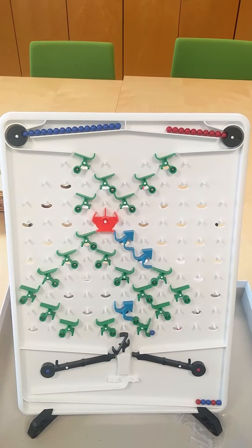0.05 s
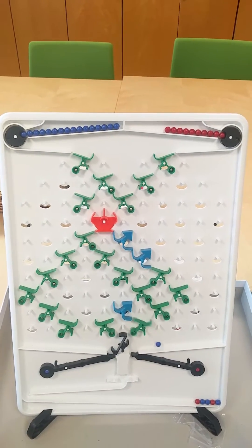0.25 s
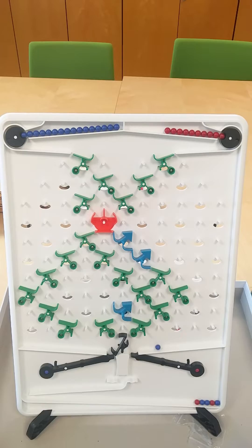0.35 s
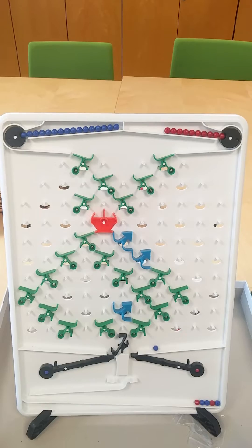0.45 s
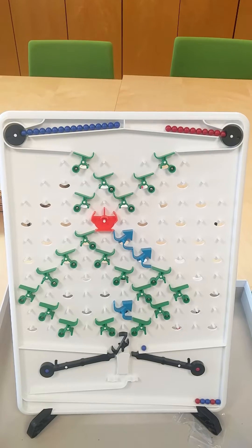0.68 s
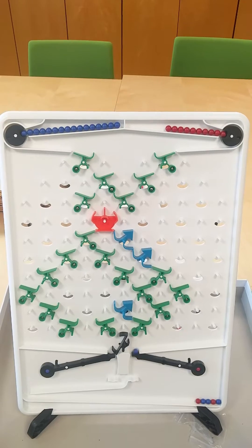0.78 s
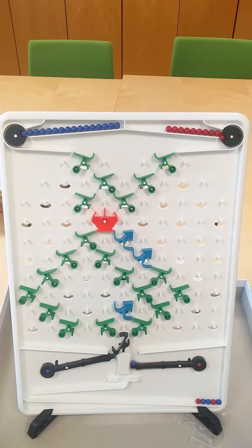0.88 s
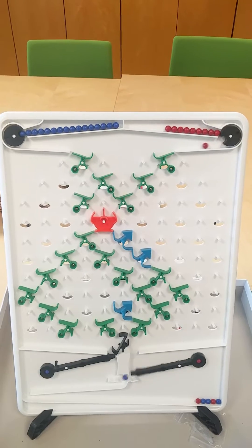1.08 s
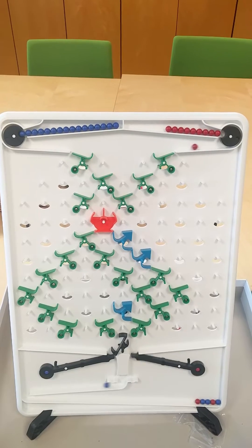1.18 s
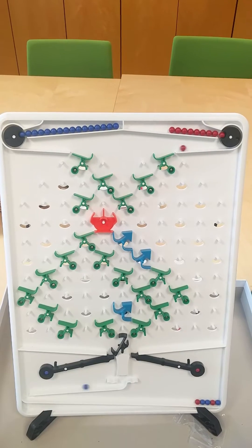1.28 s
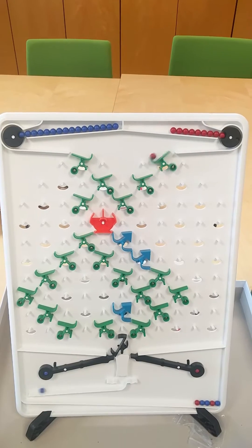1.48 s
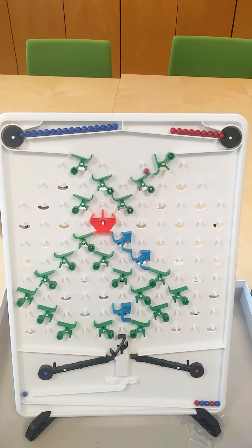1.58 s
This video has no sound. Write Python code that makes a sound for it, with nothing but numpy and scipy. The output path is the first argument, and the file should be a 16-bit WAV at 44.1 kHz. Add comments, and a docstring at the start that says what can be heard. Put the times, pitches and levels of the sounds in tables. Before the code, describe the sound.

Small balls clicking, bouncing and rolling down a plastic marble run over faint ventilation.

```python
"""Small balls run down an upright plastic marble board in a meeting room, over rumbling ventilation.
One drops on to the upper ramp and bounces to rest, each inelastic impact bringing the next sooner.
It rolls on to a lever that trips the ball release, then bounces on the lower ramp. The lever falls
back, the release snaps shut and the next ball rolls in. Impacts excite the damped modes of the
plastic, rolling shakes the board through tiny bumps, and the room reflects both."""
import sys
import numpy as np
from scipy import signal
from scipy.fft import rfft, irfft
from scipy.io import wavfile

SR = 44100
rng = np.random.default_rng(int(sys.argv[2]) if len(sys.argv) > 2 else 0)


def put_to_file(sound):
    """Save the sound as 16-bit audio at rate SR, in the file named by the first command-line argument."""
    columns = np.atleast_2d(sound).T  # one column per channel
    safe = np.clip(columns, -1, 1)
    whole_steps = np.round(safe * 32767)
    wavfile.write(sys.argv[1], SR, whole_steps.astype(np.int16))


N = 72765


def amp(db):
    """Decibel scale: level to amplitude ratio."""
    return 10 ** (np.asarray(db) / 20)


def unit(x):
    """Normalisation to a mean energy of one per channel."""
    return x / np.sqrt(np.mean(np.sum(x ** 2, -1)) + 1e-20)


def read(points, hz):
    """Interpolation of a table on a log-frequency axis."""
    f, value = np.transpose(points)
    return np.interp(np.log(hz + 1), np.log(f + 1), value)


def add(mix, start_s, sound):
    """Superposition: a sound joins the mix at its start time."""
    part = mix[:, max(round(start_s * SR), 0):][:, :sound.shape[1]]
    part += sound[:, :part.shape[1]]


def coloured(x, curve, size=2048):
    """Minimum-phase filtering at unit energy; curve maps frequency to decibels."""
    hz = abs(np.fft.fftfreq(size, 1 / SR))
    log_gain = np.log(amp(np.maximum(curve(hz), -100)))
    taps = np.fft.ifft(np.exp(np.conj(signal.hilbert(log_gain)))).real[:size // 2]
    return signal.fftconvolve(x, unit(taps)[None], axes=1)[:, :x.shape[1]]


# left-right likeness of the direct sound: (frequency [Hz], coherence [0-1])
COHERENCE = [(50, 0.99), (300, 0.83), (800, 0.78), (2000, 0.66), (5000, 0.18), (9000, 0.17)]
def paired(x, lead_ms=None, spacing_m=0.18, sound_m_per_s=343):
    """Spatial coherence at two microphones: direct sound with a left lead, or else a diffuse field."""
    hz = np.fft.rfftfreq(x.shape[1], 1 / SR)
    left, unrelated = rfft(x)
    coherence = read(COHERENCE, hz)
    if lead_ms is None:
        coherence *= np.sinc(2 * hz * spacing_m / sound_m_per_s)
        lead_ms = 0
    right = coherence * left + np.sqrt(1 - coherence ** 2) * unrelated
    delay = np.exp(-2j * np.pi * hz * lead_ms / 1000)
    return irfft(np.array([left, right * delay]), x.shape[1])


# spectrum of the ventilation: (frequency [Hz], relative level [dB])
VENT_SPECTRUM = [(20, -26), (42, -18), (70, -2), (110, -0.5), (150, -7), (220, -13), (270, -17.5),
                 (320, -7.5), (500, -20.5), (620, -17), (700, -8), (800, -33.5), (1100, -23), (2500, -36),
                 (6000, -35), (8000, -40.5), (10000, -61.5), (13000, -56)]
def ventilation(air_db=-69, hum_hz=108, hum_db=-78):
    """Stationary noise in a diffuse field: a low rumble, with a faint pure tone."""
    noise = paired(rng.standard_normal((2, N + 4096)))
    air = coloured(noise, lambda f: read(VENT_SPECTRUM, f), size=8192)[:, -N:]
    hum = np.sin(2 * np.pi * hum_hz * np.arange(N) / SR)
    return amp(air_db) * np.sqrt(N) * unit(air) + amp(hum_db) * hum


# decay of the room: (frequency [Hz], reverberation time [s])
ROOM_T60 = [(150, 0.84), (500, 0.19), (1000, 0.22), (2000, 0.4), (4000, 0.26), (7000, .27), (8500, 0.36),
            (10000, 0.32)]
# strength of the reflections: (frequency [Hz], level [dB])
ROOM_LEVEL = [(150, -16), (500, -4), (1500, -1.5), (4000, -4), (7000, -5), (10000, -5.5)]
def room(x, first_s=0.001, build_s=0.01):
    """Reverberation: diffuse reflections build up and decay exponentially, slowest in the bass."""
    t = np.arange(SR // 2) / SR
    hz, age, bands = signal.stft(paired(rng.standard_normal((2, len(t)))), SR, nperseg=256)
    t60 = read(ROOM_T60, hz)[:, None]
    bands *= amp(read(ROOM_LEVEL, hz)[:, None] - 60 * age / t60)
    bands *= np.sqrt(2 * np.log(1000) / t60 / SR)  # a longer decay adds no energy
    tail = signal.istft(bands, SR, nperseg=256)[1][:, :len(t)]
    onset = np.clip((t - first_s) / build_s, 0, 1)
    return signal.fftconvolve(x, tail * onset, axes=1)[:, :N]


def smooth_reverberation(x, count=4, turn_s=0.07):
    """Room reverberation: four random tails crossfade in turn, every 70 ms, so echoes sound smooth."""
    turn = np.arange(N) / SR / turn_s
    turns_away = [abs((turn - k + count / 2) % count - count / 2) for k in range(count)]
    return sum(room(x * np.cos(np.pi / 2 * np.minimum(away, 1))) for away in turns_away)


# strength of the rolling, before its treble is dulled: (time [s], level [dB])
ROLL_LEVEL = [(0, -55), (0.072, -62.5), (0.091, -57), (.115, -87), (.16, -65.5), (.2, -58.5), (.42, -52.5),
              (.5, -50.5), (.55, -72), (.62, -81), (0.739, -76.5), (.8, -66.5), (0.871, -68), (1.0, -66.5),
              (1.19, -58), (1.33, -54.5), (1.43, -53), (1.65, -51)]
# response of the board to rolling: (frequency [Hz], relative level [dB])
ROLL_SPECTRUM = [(100, -19.5), (220, -20.5), (310, 1), (500, -21.5), (700, 0), (1200, 3.5), (2100, 3),
                 (3400, -2), (5000, -0.5), (6900, -8.5), (8000, -40), (8800, -24.5), (10000, -45.5)]
def rolling(bumps_per_s=3400, treble_hz=2170, fast_db=-57):
    """Roughness excitation: tiny bumps shake the board; a faster, louder ball sounds brighter."""
    bumps = rng.standard_normal((2, N)) * (rng.random(N) < bumps_per_s / SR)
    bumps *= amp(1.5 * np.minimum(rng.exponential(1, N), 2))  # up to 3 dB of extra spread
    shake = coloured(paired(bumps, lead_ms=0.11), lambda f: read(ROLL_SPECTRUM, f))
    shake = np.sqrt(N) * unit(shake)
    level = np.interp(np.arange(N) / SR, *np.transpose(ROLL_LEVEL))
    dull = signal.sosfiltfilt(signal.butter(2, treble_hz, fs=SR, output="sos"), shake)
    treble = (shake - dull) * amp(np.minimum(level - fast_db, 0))
    return amp(level) * (dull + treble)


# loose parts knocking on the board: (time [s], level [dB])
THUD_BLOWS = [(.2545, -18.5), (.339, -26.5), (1.062, -21.5), (1.2719, -17.5), (1.283, -25)]
# spectrum of the flexing board: (frequency [Hz], relative level [dB])
THUD_SPECTRUM = [(100, -31), (200, -13), (300, -5.5), (500, -3), (700, -1.5), (900, -4.5), (1300, -10.5),
                 (3000, -13), (8000, -49.5)]
def thuds(t60=0.045, attack_s=0.00066):
    """Flexural vibration: soft blows bend the whole board, sounding low, hollow and short."""
    t, out = np.arange(SR // 5) / SR, np.zeros((2, N))
    envelope = (1 - np.exp(-t / attack_s)) * amp(-60 * t / t60)
    for start_s, db in THUD_BLOWS:
        flex = paired(rng.choice([-1., 1.], (2, len(t))), lead_ms=0.14) * envelope
        add(out, start_s, amp(db) * unit(coloured(flex, lambda f: read(THUD_SPECTRUM, f))))
    return out


def strikes(blows, spectrum, modes, t60, attack_s, ring_db, body_db, pan_db, lead_ms):
    """Modal superposition: a blow excites a crack of dense modes, a few ringing ones and a board boom."""
    repeat_share = 0.3  # part of the crack's energy that is alike from blow to blow
    bass_hz, pivot_hz, body_t60 = 910, 3500, 0.35
    body_band = signal.butter(3, [250, 756], "band", fs=SR, output="sos")
    t, out = np.arange(SR // 3) / SR, np.zeros((2, N))
    rise = 1 - np.exp(-t / attack_s)
    common = rng.choice([-1., 1.], (2, len(t)))
    for start_s, db, bass_db, tilt_db in blows:
        def colour(f):
            octaves = np.log2(np.maximum(f, bass_hz) / pivot_hz)
            return read(spectrum, f) + bass_db / (1 + (f / bass_hz) ** 2) + tilt_db * octaves

        fresh = rng.choice([-1., 1.], common.shape)
        dense = paired(np.sqrt(repeat_share) * common + np.sqrt(1 - repeat_share) * fresh, lead_ms)
        crack = coloured(dense * rise * amp(-60 * t / t60), colour)
        ring = sum(amp(level - 60 * t / mode_t60) * np.sin(2 * np.pi * (hz * t + rng.random((2, 1))))
                   for hz, level, mode_t60 in modes)
        body = signal.sosfilt(body_band, dense * amp(-60 * t / body_t60))
        blow = unit(crack) + amp(ring_db) * unit(ring * rise) + amp(body_db + bass_db) * unit(body)
        add(out, start_s, amp(db) * blow)
    return out * amp([[pan_db / 2], [-pan_db / 2]])


# a ball touching small parts: (time [s], level [dB], bass [dB], treble tilt [dB/octave])
TICK_BLOWS = [(.006, -31, -1.5, -1.5), (1.009, -27, -3.5, -2), (1.3935, -11.5, -3, 0.5),
              (1.3962, -18.5, -9, 3), (1.4045, -28.5, 4, -4.5), (1.454, -27.5, 25.5, 15),
              (1.521, -36, 17, -2), (1.536, -24.5, -0.5, 0), (1.644, -20.5, -11, -1)]
# crack of the small parts: (frequency [Hz], relative level [dB])
TICK_SPECTRUM = [(100, -40), (650, -3.5), (1500, -19), (3900, -11), (4550, 4), (5400, 2), (6200, -7),
                 (6900, -1.5), (8000, -34), (9100, -17.5), (10000, -51)]
# their resonances: (frequency [Hz], relative level [dB], T60 [s])
TICK_MODES = [(4800, 0.29, .04), (4800, -1.2, .04), (5100, -1.6, .04)]
def ticks():
    """Damped resonance: small parts touched by a ball ring high and die quickly."""
    return strikes(TICK_BLOWS, TICK_SPECTRUM, TICK_MODES, t60=0.028, attack_s=0.00037,
                   ring_db=-20.5, body_db=-27.5, pan_db=2, lead_ms=0.061)


# the release opening and shutting: (time [s], level [dB], bass [dB], treble tilt [dB/octave])
RELEASE_BLOWS = [(.8755, -12, 8, 2), (.891, -20, -6, -3), (.9058, -14.5, 7, 1), (1.2712, -3, 6.5, 4)]
# crack of the release: (frequency [Hz], relative level [dB])
RELEASE_SPECTRUM = [(100, -30), (300, -29), (700, -10), (1200, -15), (2800, -9.5), (4700, -4.5), (5450, 2),
                    (6200, -6), (7000, -19), (7450, -13), (8000, -29.5), (8700, -24), (10000, -46)]
# its resonances: (frequency [Hz], relative level [dB], T60 [s])
RELEASE_RING = [(5520, 0.5, 0.15), (5350, -27, 0.24)]
def ball_release():
    """Impulsive excitation: the brief contacts of the release give bright snaps."""
    return strikes(RELEASE_BLOWS, RELEASE_SPECTRUM, RELEASE_RING, t60=0.046, attack_s=0.00025,
                   ring_db=-17.5, body_db=-25, pan_db=0.5, lead_ms=0.11)


# the lever hitting its stop: (time [s], level [dB], bass [dB], treble tilt [dB/octave])
LEVER_BLOWS = [(1.212, 3.5, 4, -2.5), (1.231, -10.5, 6.5, -3.5), (1.251, -12, 7, 3.5), (1.329, -19, 18, -1),
               (1.372, -25, 18, -2.5)]
# crack of the lever: (frequency [Hz], relative level [dB])
LEVER_SPECTRUM = [(100, -38), (300, -44), (1000, -16.5), (2000, -8.5), (2500, -7), (3700, -5.5), (4700, 2),
                  (5800, -0.5), (7000, -5), (8000, -32), (9000, -17), (10000, -42)]
# its resonances: (frequency [Hz], relative level [dB], T60 [s])
LEVER_RING = [(1810, -26, .15), (2090, -21, 0.36), (3125, -3.5, 0.5), (4710, 15, 0.14), (4400, -1, 0.19),
              (4780, -4, 0.05)]
def lever():
    """Free vibration: the lever falls back on its stop and rings after each weakening knock."""
    return strikes(LEVER_BLOWS, LEVER_SPECTRUM, LEVER_RING, t60=0.033, attack_s=0.00041,
                   ring_db=-19, body_db=-36.5, pan_db=0.5, lead_ms=0.15)


# bounces on the lower ramp: (time [s], level [dB], bass [dB], treble tilt [dB/octave])
LOWER_BLOWS = [(1.0181, -16, 10, 2), (1.036, 1.5, -1, 3), (1.0905, -3, -5, 1), (1.128, -2, -0.5, 2),
               (1.1548, -9.5, -9, 1), (1.175, -14.5, 14, 0), (1.5693, -16.5, 5.5, -2)]
# crack of the lower ramp: (frequency [Hz], relative level [dB])
LOWER_SPECTRUM = [(100, -28), (300, -20), (650, -9.5), (1000, -6.5), (1800, -2.5), (2400, -4), (3400, -0.5),
                  (5600, -1), (7000, -5.5), (8000, -28), (8900, -19.5), (10000, -39.5)]
# its resonances: (frequency [Hz], relative level [dB], T60 [s])
LOWER_RING = [(2060, 1, 0.15), (2860, -3, 0.36), (3073, 1, 0.16), (3800, -12, .12), (4425, 2, .15),
              (4340, 8.5, 0.091), (6040, -6.5, 0.17), (6880, 8, 0.15)]
def lower_ramp():
    """Energy transfer on impact: each bounce of the ball feeds the modes of the lower ramp."""
    return strikes(LOWER_BLOWS, LOWER_SPECTRUM, LOWER_RING, t60=0.033, attack_s=0.00086,
                   ring_db=-14, body_db=-25, pan_db=0, lead_ms=0.12)


# bounces on the upper ramp: (time [s], level [dB], bass [dB], treble tilt [dB/octave])
UPPER_BLOWS = [(.0235, -14.5, 3.5, -.5), (.2099, 8.5, -1.5, 1.24), (.3085, 3, 2, 1), (.3762, 0, 0, 0),
               (.4245, -4.5, -2, 1), (.4564, -9.5, 4.5, 0.5), (.479, -13.5, 1.5, -1), (.496, -23.5, 0, -2)]
# crack of the upper ramp: (frequency [Hz], relative level [dB])
UPPER_SPECTRUM = [(100, -33), (250, -19.5), (600, -12), (950, -15.5), (1450, -4.5), (2400, -8.5), (3000, 0),
                  (4200, 1.5), (5200, -0.5), (6700, -0.5), (7300, -9), (8050, -27), (9100, -19),
                  (10000, -35.5)]
# its resonances: (frequency [Hz], relative level [dB], T60 [s])
UPPER_RING = [(1503, -8.5, 0.3), (1696, -8, 0.076), (2704, -4, 0.26), (2950, 0, 0.13), (3020, -4.5, 0.42),
              (3357, -6, 0.069), (3875, 3.5, 0.17), (4090, -2.5, .2), (4884, -1, 0.11), (4860, -5.5, 0.12),
              (6700, -1.5, 0.17), (6500, 1.5, 0.17), (7260, -12, 0.18)]
def upper_ramp():
    """Inelastic collision: after the main drop, the ball's bounces come ever sooner and softer."""
    return strikes(UPPER_BLOWS, UPPER_SPECTRUM, UPPER_RING, t60=0.037, attack_s=0.00055,
                   ring_db=-12, body_db=-29, pan_db=0.5, lead_ms=0.12)


def scene():
    """Superposition of the board's direct sound, its reflections and the ventilation."""
    board = upper_ramp() + lower_ramp() + lever() + ball_release() + ticks() + thuds() + rolling()
    return board + smooth_reverberation(board) + ventilation()


# balance of the two microphones: (frequency [Hz], left minus right level [dB])
MIC_BALANCE = [(100, -2), (300, 2.5), (700, -1), (1500, -2.5), (3500, -1.5), (5000, -1), (6200, -3),
               (7300, -8), (9000, -5)]
def record(dry, ceiling_db=-9.5, cutoff_hz=10000):
    """Transduction: each microphone colours the sound, saturation rounds peaks, a low-pass follows."""
    hz = np.fft.rfftfreq(2 * N, 1 / SR)
    balance = amp(np.array([[0.5], [-0.5]]) * read(MIC_BALANCE, hz))
    heard = irfft(rfft(dry, 2 * N) * balance)[:, :N]
    rounded = amp(ceiling_db) * np.tanh(heard / amp(ceiling_db))
    low_pass = signal.firwin(127, cutoff_hz, window=("kaiser", 7), fs=SR)
    return signal.oaconvolve(rounded, low_pass[None], "same")


dry = scene()
out = record(dry)
put_to_file(out)
```